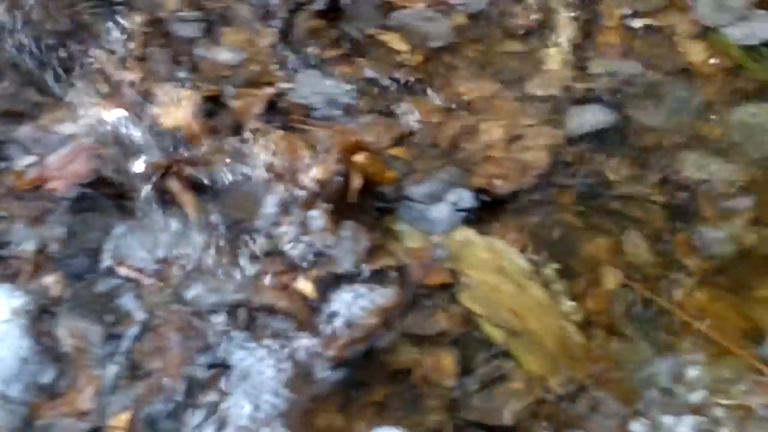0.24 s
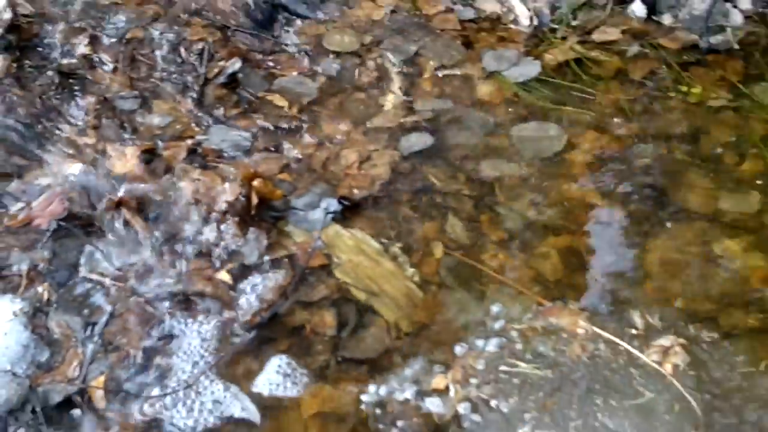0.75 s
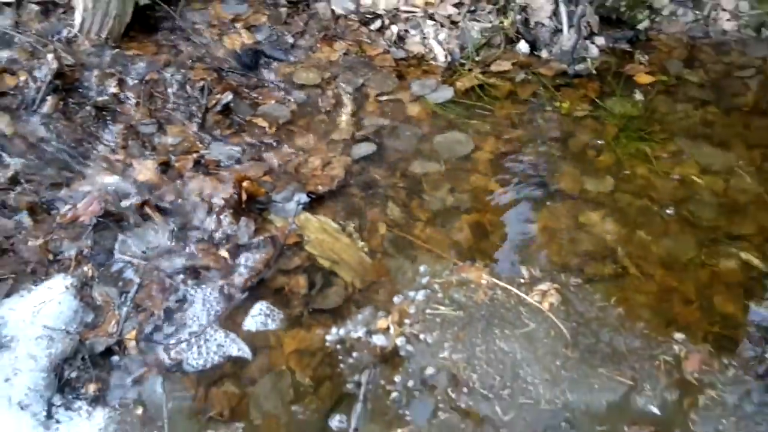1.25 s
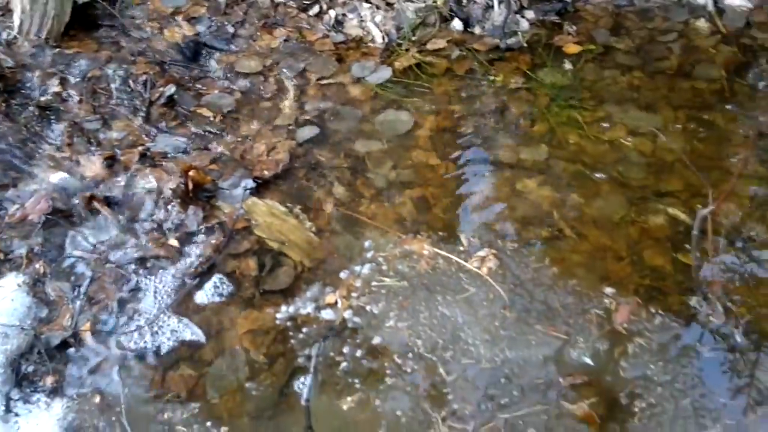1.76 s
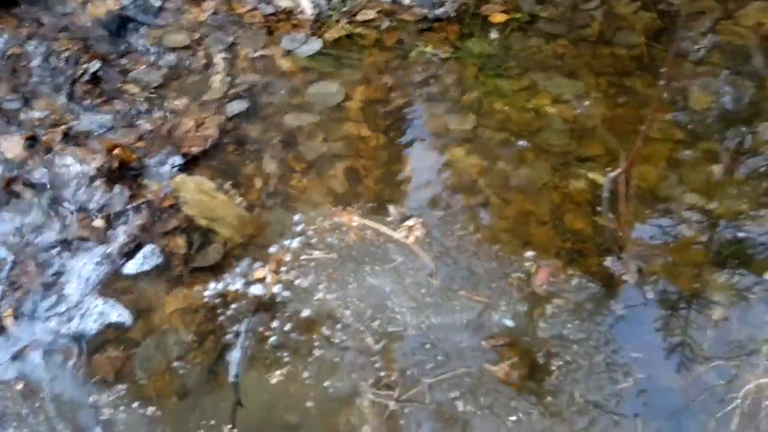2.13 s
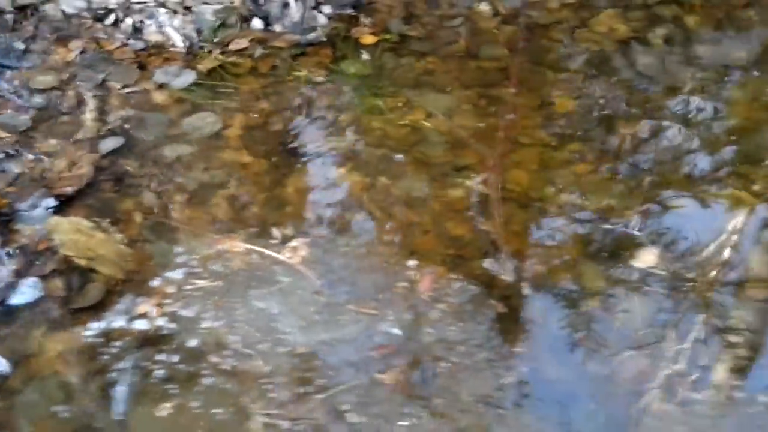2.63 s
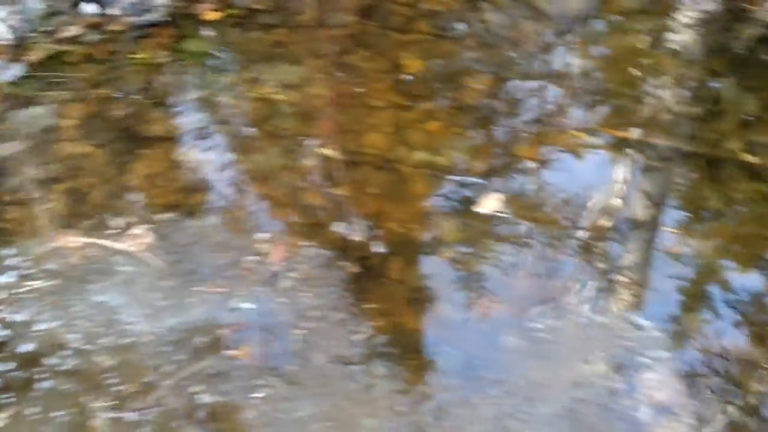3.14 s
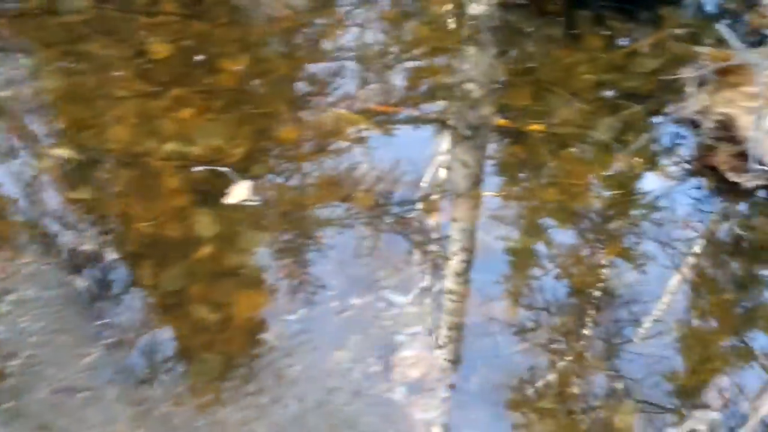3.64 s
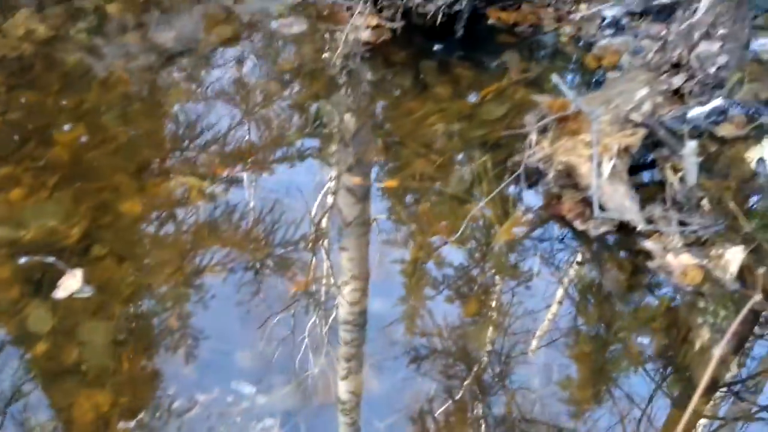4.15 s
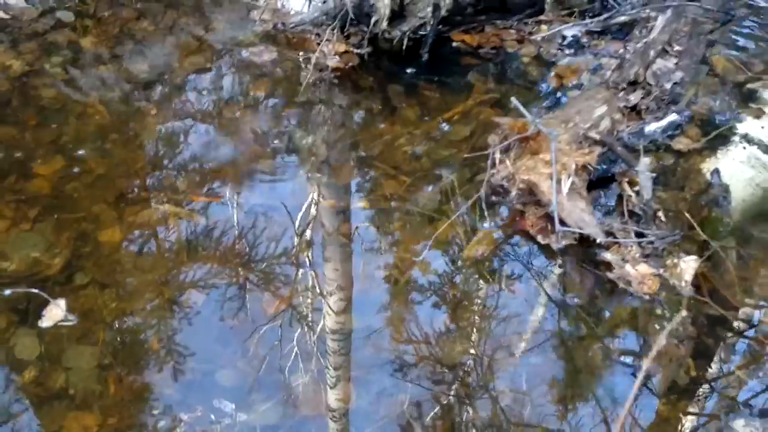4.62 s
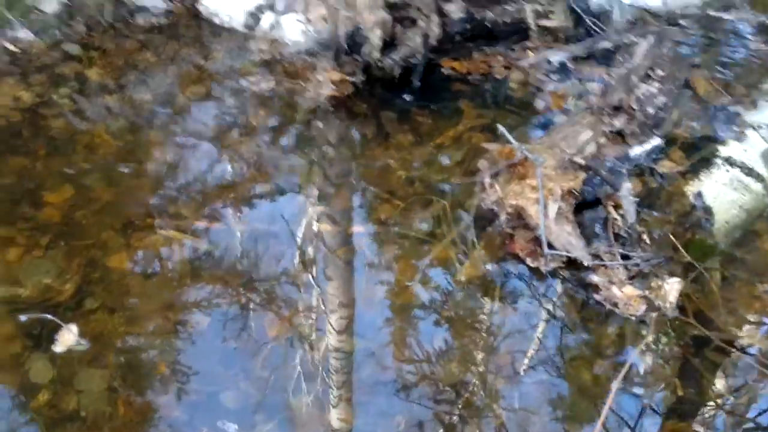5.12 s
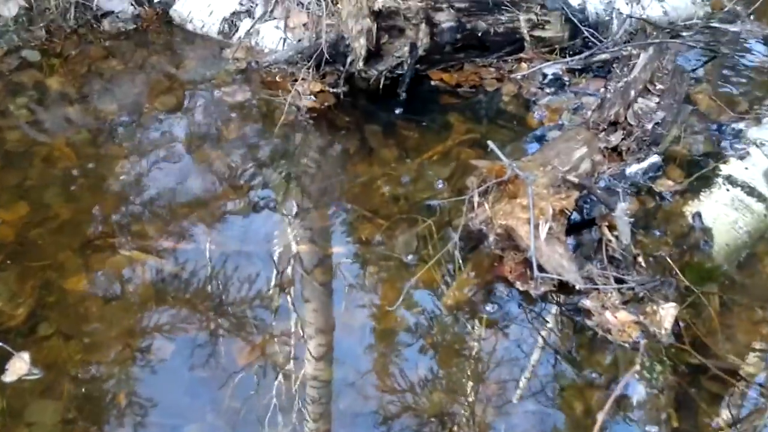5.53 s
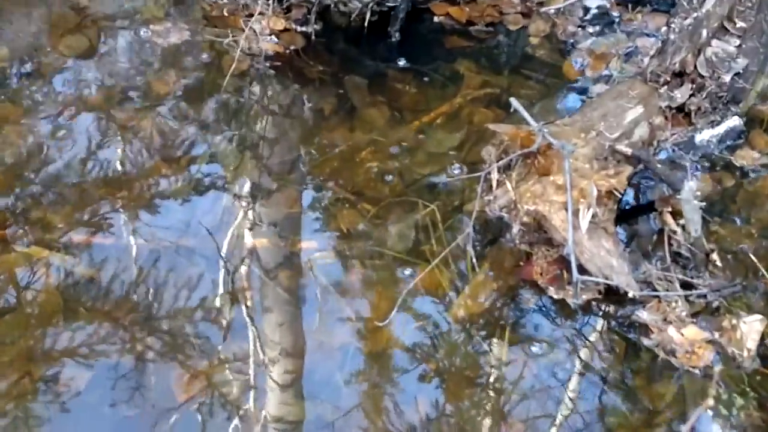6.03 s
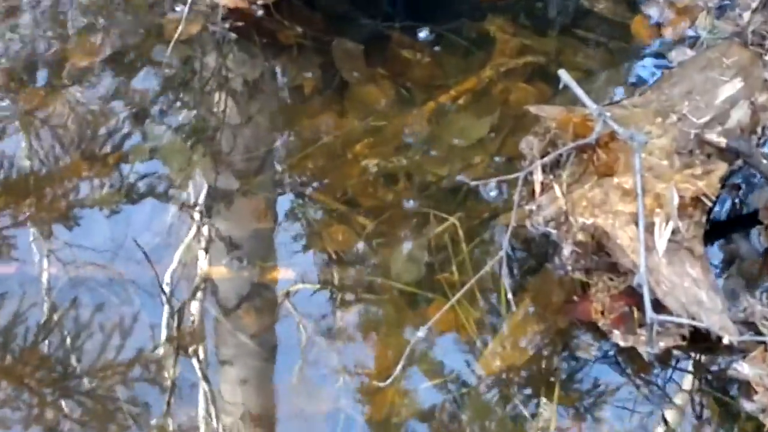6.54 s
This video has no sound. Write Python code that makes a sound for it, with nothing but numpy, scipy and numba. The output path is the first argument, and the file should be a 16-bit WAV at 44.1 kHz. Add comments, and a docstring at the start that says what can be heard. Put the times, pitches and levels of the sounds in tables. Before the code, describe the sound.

A shallow stream babbles continuously very near a hand-held stereo microphone outdoors: a soft, low-mid rush with deep glugs, crisp irregular plinks and fine spray, brighter on the left at first. Light wind rumbles from 0.3 s. Around 1.8-2.2 s the water grows fuller and wind flutters, with sharp knocks mostly on the left; a tiny dry click follows at 2.4 s. At 2.65-2.75 s comes the heaviest buffet, a cluster of low thumps, and the water drops briefly. Faint, slightly raspy bird chirps sound at 3.1-3.5 s, while softer puffs bump on the left from 3.6 to 4 s. Frothy pouring swells around 4.5 s. Another hard thump hits at 5.1 s and the water dips again, with faint peeps at 5.3 and 5.5 s. Low wind then shifts right as the trickle recovers and continues to 6.8 s.

```python
"""Woodland: a shallow brook runs over leaves and twigs, close to a hand-held phone with two microphone ports.
The stream's rush is shaped noise plus deep glugs; a small bird and one bubble chirp as sliding, raspy sines.
Wind is low noise in gusts, with fluttering noise and short pressure puffs that thump on the ports.
Trickle, froth, spray and single plinks are clusters of damped sines, one per bubble, with short echoes.
The level of the water dips briefly after the heavy thumps near 2.7 and 5.1 s."""
import sys
import numpy as np
from scipy import signal
from scipy.fft import rfft, irfft
from scipy.io import wavfile
from scipy.ndimage import uniform_filter1d
from numba import njit

SR = 44100
rng = np.random.default_rng(int(sys.argv[2]) if len(sys.argv) > 2 else 0)


def file_out(sig):
    """Save sig as 16-bit WAV at sys.argv[1]."""
    # one column per channel
    cols = np.atleast_2d(sig).T
    # limit, then scale
    lim = np.clip(cols, -1, 1)
    pcm = np.round(lim * 32767).astype(np.int16)
    wavfile.write(sys.argv[1], SR, pcm)


N = 298557
TIME = np.arange(N) / SR


def undb(db):
    """Decibels to gain."""
    return 10 ** (np.asarray(db) / 20)


def curves(table):
    """Columns of a table, joined by straight lines in time."""
    time_s, *columns = np.transpose(table)
    return [np.interp(TIME, time_s, column) for column in columns]


def sides(pan_db):
    """Gains of left and right port; the louder one gets the full level."""
    return undb(np.minimum([[pan_db], [-pan_db]], 0))


def add(out, start_s, sound):
    """Mix a sound in from start_s, cut at the end of the scene."""
    first = max(int(start_s * SR), 0)
    room = out[..., first:first + sound.shape[-1]]
    room += sound[..., :room.shape[-1]]


def unit(x):
    """Scale to rms 1."""
    return x / np.sqrt(np.mean(x ** 2, axis=-1, keepdims=True))


def lowpass(x, top_hz, order=6):
    """Butterworth low-pass."""
    return signal.sosfilt(signal.butter(order, top_hz, fs=SR, output="sos"), x)


def colour(x, points, size=4096):
    """Minimum-phase filter with the given (Hz, dB) spectrum."""
    hz, db = np.transpose(points)
    grid_hz = np.maximum(np.arange(size // 2 + 1) * SR / size, 1)
    grid_db = np.interp(np.log(grid_hz), np.log(hz), db)
    cepstrum = irfft(np.log(undb(grid_db)))
    cepstrum[1:size // 2] *= 2  # fold onto positive time: causal
    cepstrum[size // 2 + 1:] = 0
    impulse = irfft(np.exp(rfft(cepstrum)))
    return signal.fftconvolve(x, impulse)[:len(x)]


def noise(points):
    """Noise of rms 1 with the given spectrum."""
    return unit(colour(rng.standard_normal(N), points))


def walk(rate_hz):
    """Smooth random drift of rms near 1, rate_hz new values per second."""
    hold = int(SR / rate_hz)
    steps = np.repeat(rng.standard_normal(N // hold + 1), hold)
    return unit(uniform_filter1d(uniform_filter1d(steps, hold), hold)[:N])


@njit
def ring(start_s, hz, cycles, left, right, lag, rise):
    """Bubbles as damped sines, pitch climbing toward the surface; the right port hears each lag samples later."""
    out = np.zeros((2, N))
    for k in range(len(start_s)):
        life = cycles[k] / hz[k] * SR  # decay time in samples
        first, phase = int(start_s[k] * SR), 0.
        for j in range(int(5 * life)):
            phase += 2 * np.pi * hz[k] * (1 + rise * j / life) / SR
            v = np.sin(phase) * np.exp(-j / life) * (1 - np.exp(-phase / 3))
            i, late = first + j, first + j + int(lag[k])
            if 0 <= i < N and 0 <= late < N:
                out[0, i] += left[k] * v
                out[1, late] += right[k] * v
    return out


def banks(x, echo_db, decay_s):
    """Surface, stones and banks scatter sound: a decaying tail of sparse random echoes per port."""
    t = TIME[:SR // 8]
    spikes = rng.standard_normal((2, len(t))) ** 3
    echoes = unit(spikes * np.exp(-t / decay_s) * (t > .001)) / np.sqrt(len(t))
    return x + undb(echo_db) * signal.fftconvolve(x, echoes, axes=1)[:, :N]


# spectrum of the rush: (frequency [Hz], density [dB])
RUSH_SPECTRUM = [(40, 0), (150, -2), (300, -2.5), (450, -2), (650, 1.5), (1000, 0), (1300, -8), (1800, -22),
                 (3000, -31), (15000, -72)]


def rush(rush_db):
    """Soft roar of the whole stream: noise mostly shared by both ports, with deep bubble glugs in it."""
    when, pitch, loud = rng.random((520, 3)).T
    gain = undb(21 * loud)
    cycles = np.full(len(when), 7.)
    glugs = unit(ring(when * N / SR, 520 * 2.4 ** pitch, cycles, gain, gain, 0 * gain, 0.029))
    body = noise(RUSH_SPECTRUM) * undb(2.59 * walk(14)) + undb(-5.0) * glugs
    apart = np.array([noise(RUSH_SPECTRUM), noise(RUSH_SPECTRUM)]) * undb([[-9], [-12]])
    return (body * sides(pan_db=9) + apart) * undb(rush_db)


# chirps, of a bird but for the bubble at 4.452 s:
# (start [s], length [s], nominal pitch [Hz], level [dB], left minus right [dB])
CHIRPS = [(3.092, 0.043, 4140, -47, 14), (3.176, 0.089, 4210, -37.5, -11), (3.471, 0.04, 4000, -42, -7),
          (4.21, 0.085, 2670, -52, -18), (4.452, 0.062, 4030, -53, 0), (5.28, 0.07, 4340, -48.5, -9),
          (5.53, 0.057, 4240, -46, -15)]


def chirps(rasp_db=-5, rasp_hz=420):
    """Bird and one bubble: a sine slides up then sags slightly, with a rough sine 7 % below, and echoes."""
    out = np.zeros((2, N))
    for start_s, length_s, hz, db, pan_db in CHIRPS:
        u = np.linspace(0, 1, int(length_s * SR))
        drifts = unit(uniform_filter1d(rng.standard_normal((2, SR // 4)), SR // 900))
        waver, rasp = drifts[:, :len(u)]
        pitch_hz = hz * (1 - 0.114 * np.exp(-u / 0.122) - 0.04 * u ** 2)
        clean = np.sin(2 * np.pi * np.cumsum(pitch_hz + 100 * waver) / SR)
        rough = np.sin(2 * np.pi * np.cumsum(.93 * pitch_hz + rasp_hz * rasp) / SR)
        chirp = (clean + undb(rasp_db) * rough) * np.sin(np.pi * u) ** 2
        add(out, start_s, chirp * undb(db) * sides(pan_db))
    return banks(lowpass(out, top_hz=4550, order=12), echo_db=-10.5, decay_s=0.053)


# gusts: (start [s], end [s], rumble [dB], flutter [dB], left minus right [dB])
WIND_GUSTS = [(0.304, 0.358, -33, -66, 21), (0.415, 0.519, -41.5, -70, 15), (0.69, 0.943, -47, -79, 15),
              (1.002, 1.03, -38.5, -43, -4.5), (1.217, 1.29, -44, -68, 4), (1.483, 1.65, -35, -43.5, 0.5),
              (1.813, 1.995, -28.5, -34, -1), (2, 2.237, -34, -38.5, 4.5), (2.655, 2.762, -16.5, -23, 9),
              (3.5, 4.004, -31, -63, 23), (4.282, 4.392, -37, -57, 22), (4.547, 4.824, -32, -68, 21),
              (4.852, 5.113, -38, -52, 14), (5.109, 5.141, -26, -17.5, 25), (5.137, 5.41, -44, -49.5, 14),
              (5.611, 6.309, -37.5, -71, -23), (6.339, 6.44, -30, -71, -17), (6.46, 6.77, -35, -63, -7)]
# spectra of rumble and flutter: (frequency [Hz], density [dB])
RUMBLE_SPECTRUM = [(10, 3.5), (28, 5.5), (55, 3), (100, -4), (160, -16.5), (250, -24), (500, -37),
                   (6000, -100)]
FLUTTER_SPECTRUM = [(30, -34.5), (90, 4), (200, -1), (400, -10), (700, -15), (1200, -29.5), (2200, -30.5),
                    (3200, -55), (15000, -76)]
GUST_ATTACK_S, GUST_RELEASE_S = .02, 0.015
BREEZE_DB, BREEZE_PAN_DB = -55, 6  # light air under the gusts


def wind():
    """Eddies rumble on each port separately; gusts rise fast, hold and die away, with partly shared flutter."""
    push, force = undb(BREEZE_DB) * sides(BREEZE_PAN_DB), 0
    for start_s, end_s, rumble_db, flutter_db, pan_db in WIND_GUSTS:
        attack = np.clip((TIME - start_s) / GUST_ATTACK_S, 0, 1)
        release = np.exp(-np.maximum(TIME - end_s, 0) / GUST_RELEASE_S)
        push = push + attack * release * undb(rumble_db) * sides(pan_db)
        arch = np.interp(TIME, [start_s, (start_s + end_s) / 2, end_s], [0, 1, 0]) ** .5
        force = force + arch * undb(flutter_db) * sides(pan_db)
    eddies = np.array([unit(noise(RUMBLE_SPECTRUM) * undb(5.0 * np.tanh(walk(45)))) for _ in range(2)])
    shared = noise(FLUTTER_SPECTRUM)
    apart = np.array([noise(FLUTTER_SPECTRUM), noise(FLUTTER_SPECTRUM)])
    flutter = unit(shared + 0.83 * apart) * undb(2.6 * walk(70))
    return eddies * push + lowpass(flutter * force, top_hz=2560)


# hard puffs on a port: (time [s], level before gain [dB], length [ms], left minus right [dB])
WIND_PUFFS = [(1.8043, 3, 0.28, 24), (1.816, -7.5, 5, 9), (1.917, -4, 1.43, 12), (1.929, -4, 1.67, 6),
              (2.179, -15.5, 0.56, 36), (2.215, 2, 0.57, 25), (2.415, -19.5, 0.23, 23),
              (2.661, -9, 0.49, 36), (2.703, -4.5, 0.84, 13), (2.72, -0.5, 0.9, 13), (2.73, -8, 0.97, 7),
              (2.738, 3, 2.4, 11), (3.638, -10, 5.3, 24), (3.729, -4.5, 4.7, 26), (3.869, -11.5, 3.9, 34),
              (3.9, -15.5, 2.3, 36), (3.994, -10.5, 3.9, 32), (5.116, -1, 1.35, 26),
              (5.128, -0.5, 0.83, 20), (5.133, 0, 3.6, 6), (5.3882, -14, 0.64, 13),
              (6.379, -15.5, 5.2, -12)]


def thumps(port_hz=64, damping=1.0, roundness=0.58, recoil_s=0.00073, short_ms=0.42, high_hz=3600):
    """Rounded cusps of pressure; the port blocks steady pressure, so it swings back after each."""
    lead_s, gain_db = .02, 3.0
    out, t = np.zeros((2, N)), TIME[:SR // 20] - lead_s
    for time_s, db, length_ms, pan_db in WIND_PUFFS:
        push, pull = (np.exp(roundness - np.hypot((t - late_s) * 10 ** 3 / length_ms, roundness))
                      for late_s in (0, recoil_s))
        recoil = np.exp(-(length_ms / short_ms) ** 2)  # the briefest puffs snap back: a knock
        puff = push - recoil * pull
        add(out, time_s - lead_s, puff * undb(db + gain_db) * sides(pan_db))
    w = 2 * np.pi * port_hz
    b, a = signal.bilinear([1, 0, 0], [1, damping * w, w * w], SR)
    swing = signal.lfilter(b, a, out)
    return lowpass(np.clip(swing, -1, 1), high_hz)  # the hardest puffs overload the port


def tick(start_s=2.4118, db=-31, decay_s=0.0007):
    """One small dry click close to the left port: a fast-decaying noise burst."""
    out, t = np.zeros((2, N)), TIME[:SR // 100]
    burst = lowpass(rng.standard_normal(len(t)), top_hz=11000, order=2) * np.exp(-t / decay_s)
    add(out, start_s, burst * undb(db) * sides(pan_db=17))
    return out


# how squarely each port faces the trickle, riffle to pool: (time [s], left [dB], right [dB])
PORT_FACING = [(0, 6.5, -6), (1.0, -0.5, -5.5), (1.6, -2, -2), (3.0, 3.5, 5.5), (4.0, -1, 1.5),
               (5.0, 1.5, 5), (5.8, -5, -6.5), (6.77, -5.5, -1.5)]


def turn(time_s):
    """Left-minus-right dB as the phone turns."""
    when_s, left_db, right_db = np.transpose(PORT_FACING)
    return np.interp(time_s, when_s, left_db - right_db)


# loudest bubbles: (time [s], pitch [Hz], level before gain [dB])
BIG_BUBBLES = [(0.141, 644, -43.5), (0.21, 3440, -37.5), (0.231, 2010, -37.5), (0.334, 580, -44.5),
               (0.482, 4200, -46), (0.503, 4540, -33), (0.511, 2410, -37.5), (0.65, 4370, -42.5),
               (0.781, 2410, -34.5), (0.915, 1540, -45.5), (1.128, 4000, -34.5), (1.149, 4660, -40),
               (1.247, 3880, -39), (1.322, 1513, -42.5), (1.45, 3500, -38), (1.524, 1615, -38),
               (1.736, 2220, -43), (1.937, 2120, -32.5), (1.988, 5700, -37.5), (2.028, 1320, -41.5),
               (2.05, 2120, -30.5), (2.128, 3800, -41), (2.285, 2130, -34), (2.303, 3600, -39),
               (2.451, 2200, -31), (2.567, 1720, -44), (2.701, 2000, -32.5), (2.757, 2270, -35),
               (3.05, 2100, -45.5), (3.203, 1670, -43.5), (3.251, 5400, -38.5), (3.394, 1480, -39),
               (3.489, 3800, -34), (3.571, 2620, -41), (3.628, 2130, -39), (3.677, 1820, -50),
               (3.762, 3450, -42.5), (4.02, 2580, -44), (4.197, 1730, -36), (4.601, 2270, -38.5),
               (4.751, 1940, -46), (4.817, 1850, -38), (4.886, 2230, -36), (4.93, 695, -40),
               (5.004, 1680, -38), (5.32, 2160, -40.5), (6.05, 3960, -40.5), (6.274, 1820, -37),
               (6.315, 3970, -38), (6.351, 2410, -41.5), (6.574, 1930, -37), (6.709, 635, -46)]
# side by bubble size, riffle left, twigs right: (pitch [Hz], left minus right [dB])
BUBBLE_SIDE = [(650, 5), (1400, -4.5), (2100, -1), (2600, -6.5), (3500, 19), (5600, 20)]


def plinks(cycles=7, rise=0.038, follower_db=-12.5, trail_s=.012, gain_db=4.5, size=6):
    """Each big bubble rings out and sheds a few smaller, mostly higher ones just after."""
    time_s, hz, db = np.transpose(BIG_BUBBLES).repeat(size, axis=1)
    pan_db = np.interp(hz, *np.transpose(BUBBLE_SIDE)) + turn(time_s)
    follower = np.arange(len(time_s)) % size > 0
    delay, detune, life = rng.standard_normal((len(time_s), 3)).T
    level = undb(db + gain_db + follower_db * follower)
    gain = level * np.sqrt(2 / (1 + undb(2 * pan_db)))  # constant power over the ports
    pitch_hz = hz * np.exp((0.11 + 0.266 * detune) * follower - rise)
    lag = np.clip((hz - 900) / 70, 0, 12)  # deep glugs reach both ports in step
    shade = np.minimum(hz / pitch_hz, 1) ** 2  # the right port faces away, misses finer bubbles
    start_s = time_s + trail_s * abs(delay) * follower
    return ring(start_s, pitch_hz, cycles * np.exp(0.18 * life), gain * undb(pan_db), gain * shade, lag, rise)


GURGLE_DB, GURGLE_RISE_S, GURGLE_FALL_S = -16.5, .009, 0.023


def gurgles():
    """Gain swell of the trickle at each port round the big bubbles above 1 kHz."""
    swell = np.zeros((2, N))
    t = TIME[:SR // 4] - .1
    shape = np.exp(np.minimum(t / GURGLE_RISE_S, -t / GURGLE_FALL_S))
    for time_s, hz, db in BIG_BUBBLES:
        if hz > 1000:
            pan_db = np.interp(hz, *np.transpose(BUBBLE_SIDE)) + turn(time_s)
            add(swell, time_s + t[0], shape * undb(db + GURGLE_DB) * sides(pan_db))
    return swell


# colour of the water at each port: (frequency [Hz], level [dB])
LEFT_COLOUR = [(700, -34.5), (1250, -4.5), (1600, 1), (2000, -7), (2500, -8), (3100, -7.5), (3900, -2.5),
               (4700, -9.5), (5600, -13.5), (7000, -17), (9500, -20), (12000, -25.5), (15000, -36.5)]
RIGHT_COLOUR = [(700, -24), (1250, -2), (1600, -4), (2050, -5), (2550, -8.5), (3150, -29), (3950, -16),
                (4600, -25), (5600, -34), (8500, -30.5), (12000, -36), (15000, -37.5)]


def bubbles(lo_hz, hi_hz, cycles, spread_db, gurgle_s, scatter, rise, count, size):
    """Wavelets break at random, each trapping a cluster of bubbles of kindred size; stereo, rms 1."""
    when, pitch, force = rng.random((count, 3)).T.repeat(size, axis=1)
    delay, detune, loud, life, place, lag = rng.standard_normal((count * size, 6)).T
    hz = np.clip(lo_hz * (hi_hz / lo_hz) ** pitch * np.exp(scatter * detune), 500, SR / 3)
    gain = undb(spread_db * (np.minimum(loud, 2) + 2 * force)) * hz / lo_hz  # small bubbles are sharper
    lean = undb(2.53 * place)
    start_s = when * N / SR + gurgle_s * delay
    left, right = ring(start_s, hz, cycles * np.exp(0.61 * life), gain * lean, gain / lean, 12 + 2.6 * lag, rise)
    return unit(np.array([colour(left, LEFT_COLOUR), colour(right, RIGHT_COLOUR)]))


# thicker pour swelling over the twigs: (time [s], level [dB])
POUR_LEVEL = [(0, -60.5), (1.35, -76), (1.6, -63.5), (2.15, -53.5), (2.35, -72), (4.1, -73), (4.25, -57.5),
              (4.5, -50), (5.07, -56), (5.16, -73), (6.1, -79), (6.35, -55), (6.5, -70), (6.77, -75)]


def trickle(left_db, right_db, spray_db):
    """Bubble clusters: near gurgles, dense babble further along, a frothy pour, fine spray on the leaves."""
    near = bubbles(1493, 6480, cycles=6.9, spread_db=4.0, gurgle_s=.008, scatter=0.2517, rise=0.039,
                   count=260, size=8)
    far = bubbles(1182, 12240, cycles=10.8, spread_db=5.0, gurgle_s=.02, scatter=0.2, rise=0.04,
                  count=1500, size=6)
    froth = bubbles(1110, 5030, cycles=2.5, spread_db=-3, gurgle_s=.02, scatter=0.258, rise=0.022,
                    count=1500, size=6)
    drops = bubbles(5710, 11600, cycles=3.6, spread_db=4.5, gurgle_s=0.0033, scatter=0.224, rise=0.0082,
                    count=800, size=5)
    fizz = bubbles(7450, 14200, cycles=2.8, spread_db=0.5, gurgle_s=0.022, scatter=0.17, rise=.01,
                   count=5000, size=6)
    water = (undb(-2.5) * near + undb(-9.5) * far) * undb([left_db, right_db])
    spray = (undb(6) * drops + undb(-3.0) * fizz) * undb(spray_db) * sides(pan_db=12.5)
    pour = froth * undb(curves(POUR_LEVEL)) * sides(pan_db=-4)
    return water + pour + spray


# level of the water as heard, dipping after heavy thumps; rush, trickle and spray follow it:
# (time [s], level [dB])
WATER_LEVEL = [(0, -61), (0.41, -59.5), (0.75, -60), (1.3, -57.5), (1.77, -53.5), (2.2, -56), (2.35, -58.5),
               (2.73, -55.5), (2.8, -64.5), (3.42, -58), (4.1, -59), (4.5, -56.5), (5.1, -55.5),
               (5.2, -61.5), (5.6, -63.5), (6.1, -57.5), (6.77, -55.5)]
RUSH_DB, TRICKLE_DB, SPRAY_DB = 5.5, -1, -10  # relative to WATER_LEVEL


def scene():
    """Water, chirps, wind and click at the two ports."""
    water_db, = curves(WATER_LEVEL)
    facing_db = np.array(curves(PORT_FACING))
    trickle_gain = undb(water_db + facing_db + TRICKLE_DB) + gurgles()
    left_db, right_db = 20 * np.log10(trickle_gain)
    spray_db = water_db + SPRAY_DB + 0.68 * facing_db[0]
    slosh = unit(undb(2.05 * np.tanh(walk(28))))  # water spills in quick uneven spurts
    near_water = slosh * trickle(left_db, right_db, spray_db) + plinks()
    water = banks(near_water, echo_db=-11.5, decay_s=0.012)
    return water + rush(water_db + RUSH_DB) + chirps() + wind() + thumps() + tick()


TOP_HZ = 15400


def record(dry):
    """The phone cuts the top: steep elliptic low-pass."""
    return signal.sosfilt(signal.ellip(8, .2, 70, TOP_HZ, fs=SR, output="sos"), dry)


dry = scene()
out = record(dry)
file_out(out)
```